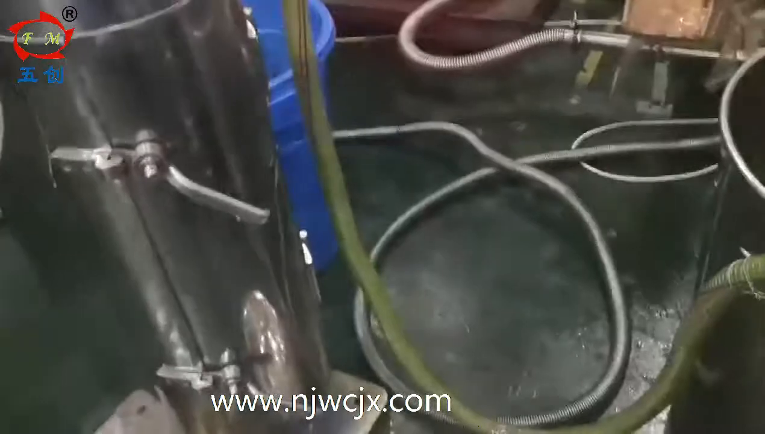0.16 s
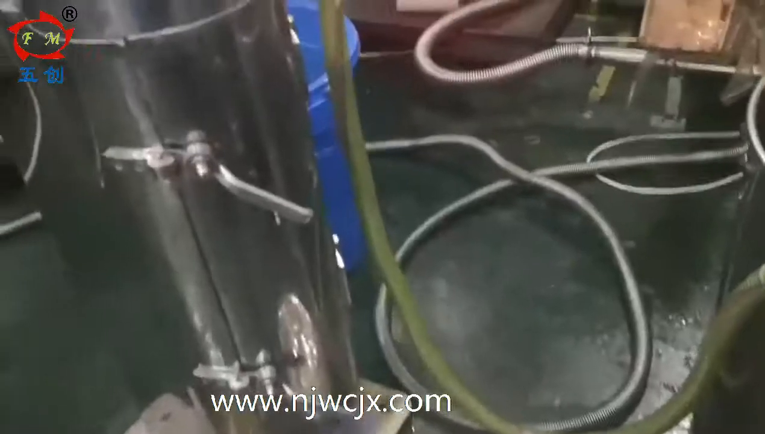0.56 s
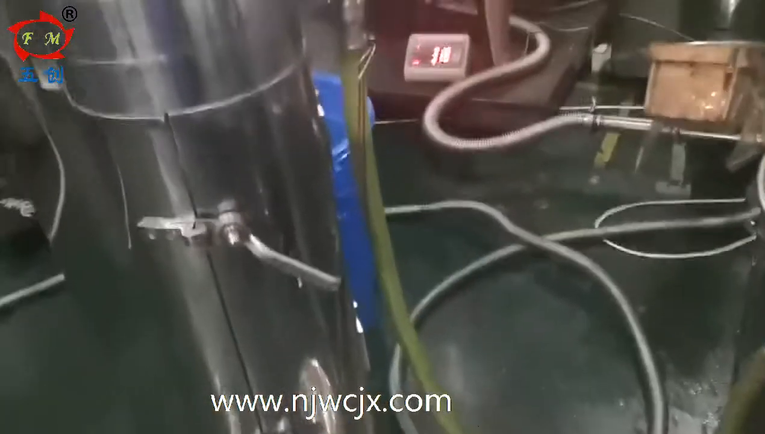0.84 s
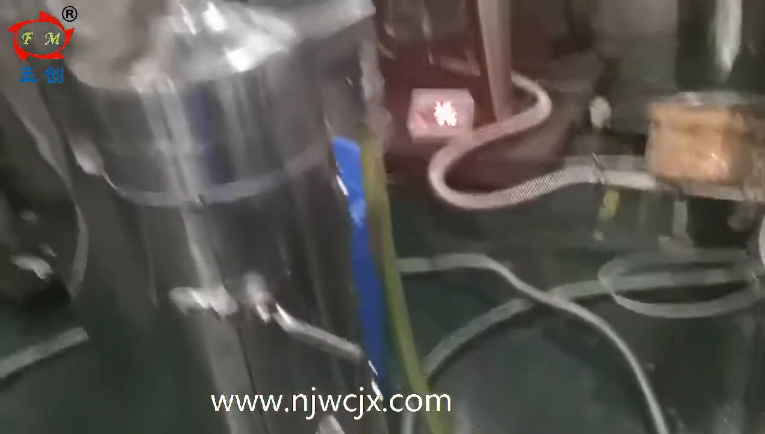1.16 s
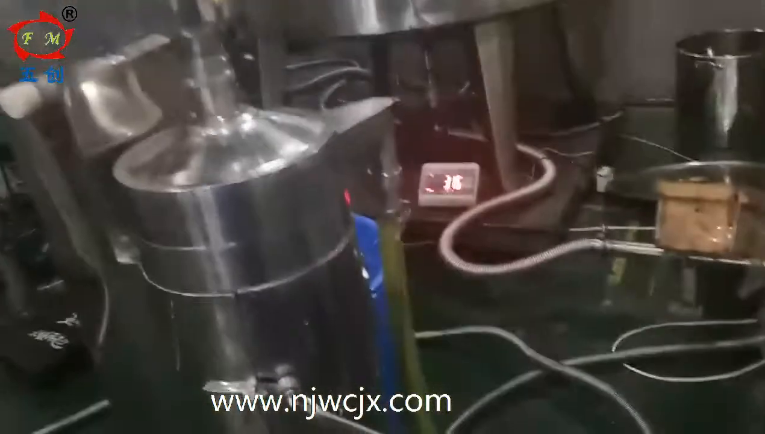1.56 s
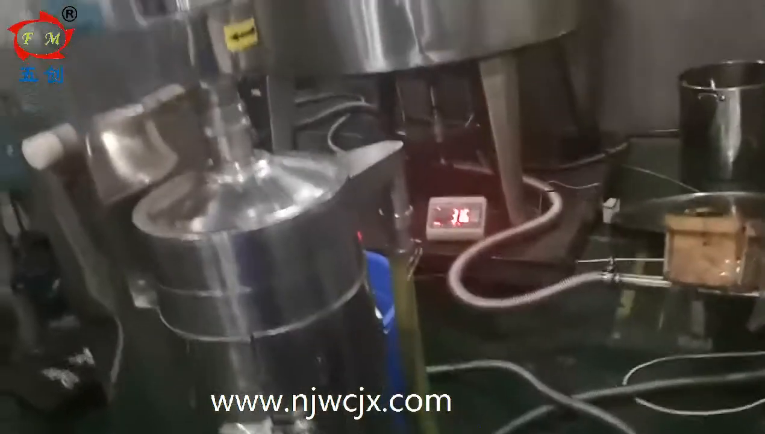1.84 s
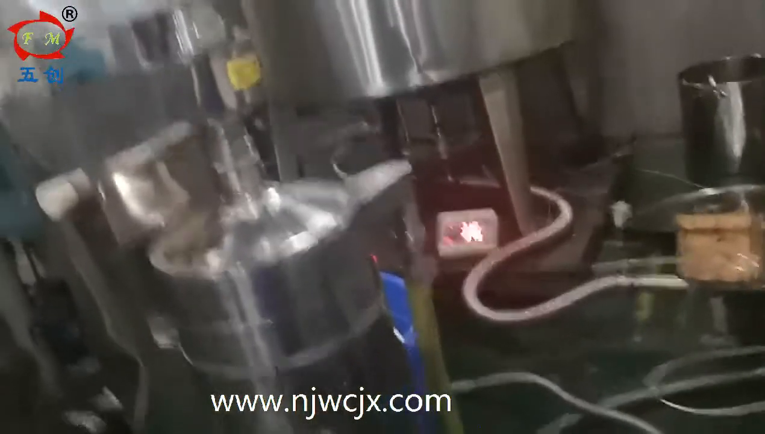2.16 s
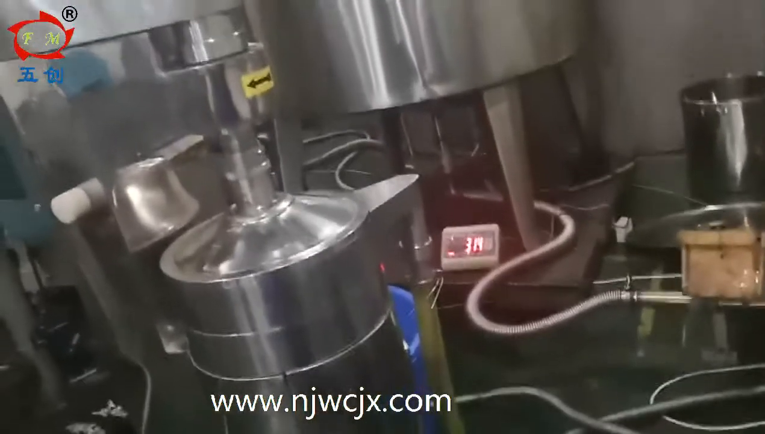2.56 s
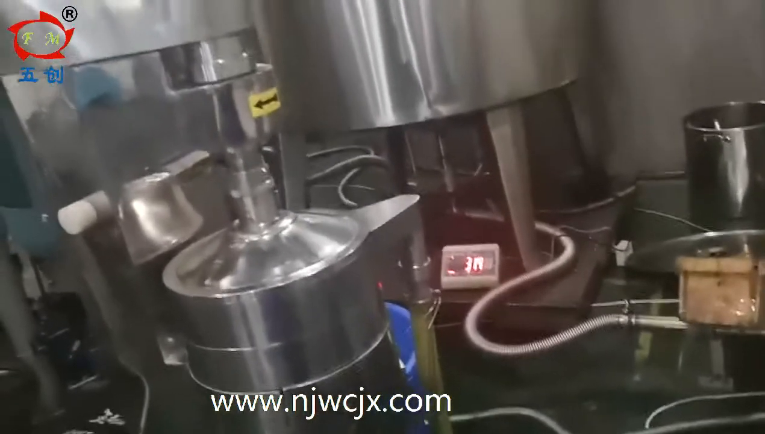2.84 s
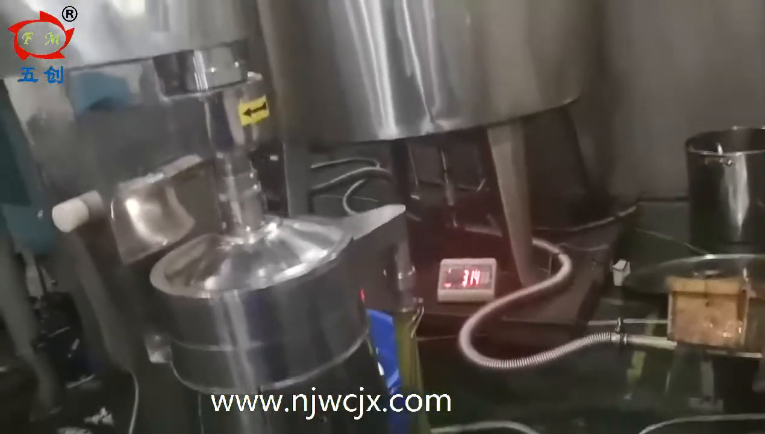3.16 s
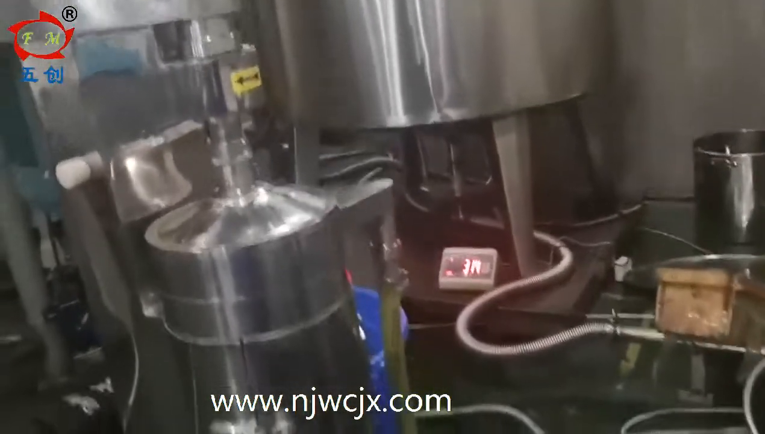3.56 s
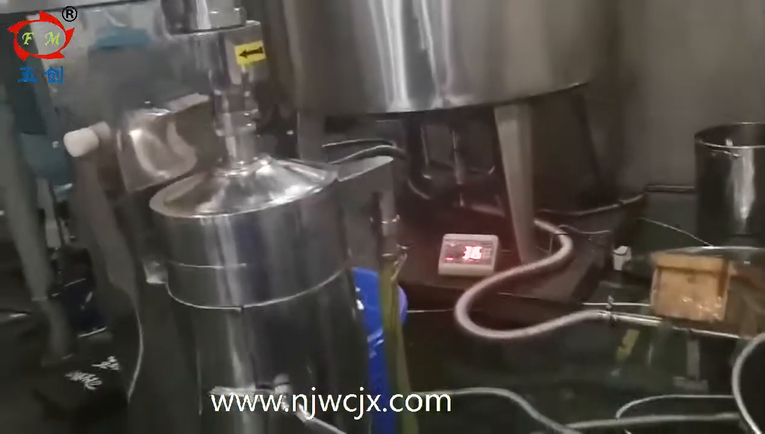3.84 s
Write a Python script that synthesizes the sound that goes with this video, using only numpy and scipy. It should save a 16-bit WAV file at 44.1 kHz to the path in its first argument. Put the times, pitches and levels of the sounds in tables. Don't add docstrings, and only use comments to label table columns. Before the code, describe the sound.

Steady industrial centrifuge roar with beating low hum, ringing metal casing and fine hiss, starting suddenly after a short silence, then dropping slightly in level; close handheld phone in a workshop with other drives whining.

```python
import sys
import numpy as np
from scipy import signal
from scipy.io import wavfile
from scipy.ndimage import uniform_filter1d

SR = 44100
rng = np.random.default_rng(int(sys.argv[2]) if len(sys.argv) > 2 else 0)


def attenuation_scalar(level_db):
    decades = np.asarray(level_db, float) / 20
    return 10 ** decades


def dump_mix(stems):
    frames = np.atleast_2d(stems).T
    limited = np.clip(frames, -1, 1)
    pcm = np.round(limited * 32767).astype(np.int16)
    wavfile.write(sys.argv[1], SR, pcm)


N = 176400

SETTLE_S, SETTLE_SPAN_S = .775, .03


def evened(x):
    return x / np.sqrt(np.mean(x ** 2) + 1e-20)


def read(points, hz):
    f, value = np.transpose(points)
    return np.interp(np.log(hz + 1), np.log(f + 1), value, left=-90, right=-90)


def step(at_s, span_s):
    return .5 - .5 * np.tanh((np.arange(N) / SR - at_s) / (2 * span_s))


def drift(top_hz, count):
    t = np.arange(0, N + 256, 256) / SR
    hz = np.geomspace(.2, top_hz, 16)
    sines = np.sin(2 * np.pi * (hz[:, None] * t + rng.random((count, 16, 1))))
    slow = (sines / np.sqrt(hz)[:, None]).sum(1)
    return np.array([np.interp(np.arange(N) / SR, t, evened(row)) for row in slow])


def tones():
    bowl_hz, idler_hz, motor_hz, fan_hz, belt_hz = 264.97, 71.01, 49.71, 216.55, 11.63
    order_mix = [(1, 0, 0, 0, 0), (3, 0, 0, 0, 0), (5, 0, 0, 0, 0), (6, 0, 0, 0, 0), (0, 1, 0, 0, 0),
                 (0, 3, 0, 0, 0), (0, 5, 0, 0, 0), (0, 6, 0, 0, 0), (1, 1, 0, 0, 0), (1, 3, 0, 0, 0),
                 (1, 5, 0, 0, 0), (2, 10, 0, 0, 0), (0, 0, 0, 1, 0), (0, 0, 0, 2, 0), (0, 0, 0, 0, 2),
                 (0, 0, 0, 0, 3), (0, 0, 0, 0, 4), (0, 0, 0, 0, 5), (0, 0, 0, 0, 10)]
    order_db = [-35.5, -36.7, -46, -49, -41.5, -44, -54, -49, -36.5, -55, -54, -41.5, -45, -48, -55, -54,
                -54, -52, -47]
    order_late_db = [-38, -36, -46, -49, -44, -43, -54, -49, -38, -55, -54, -53, -42, -49, -55, -54, -54,
                     -52, -48]
    whine_hz = [83.23, 120.7, 509.8, 550.2, 742.9, 1027.0, 1080.1, 2118.4, 2208.5, 4918.1, 5598.6, 7590.2,
                8943.6]
    whine_db = [-45, -44.5, -53, -52, -46.5, -50, -44, -48, -46, -61, -59, -65, -74]
    whine_late_db = [-43, -45, -53, -52, -55, -49, -38, -48, -44, -61, -59, -65, -74]
    beat_db = (-32.5, -34.2)
    beat_null_s = .518
    shift_s, shift_span_s, shift_m = 3.2, .09, .14
    waver_db, waver_rad = .8, .15

    t = np.arange(N) / SR
    order_hz = np.dot(order_mix, [bowl_hz, idler_hz, motor_hz, fan_hz, belt_hz])
    hz = np.r_[order_hz, whine_hz][:, None]
    loose = np.sqrt(hz / bowl_hz)
    phase = 2 * np.pi * (hz * t + rng.random(hz.shape))
    phase = phase + waver_rad * loose * drift(3.04, count=len(hz))
    before = attenuation_scalar(np.r_[order_db, whine_db][:, None]) * np.sin(phase)
    later_phase = phase - 2 * np.pi * hz * shift_m / 343
    after = attenuation_scalar(np.r_[order_late_db, whine_late_db][:, None]) * np.sin(later_phase)
    early = step(shift_s, shift_span_s)
    waver = attenuation_scalar(waver_db * np.minimum(loose, 3) * drift(3.0, count=len(hz)))
    hum = waver * (early * before + (1 - early) * after)

    pair_hz = np.array([[2 * idler_hz], [3 * motor_hz]])
    pair_db = np.array(beat_db)[:, None] + waver_db * drift(1.38, count=2)
    pair = attenuation_scalar(pair_db) * np.sin(2 * np.pi * pair_hz * (t - beat_null_s))
    return np.sqrt(2) * (hum.sum(0) + pair[0] - pair[1])


def casing():
    # f/Hz, width/Hz, level/dB
    modes = [(888, 7.1, -44), (1317, 60, -39.5), (1700, 58, -31.5), (1805, 65, -32.5), (1917, 83, -34),
             (2010, 44, -37.5), (2196, 42, -41), (2603, 77, -38), (2894, 52, -47.5), (3593, 130, -40.5),
             (3920, 140, -50), (5380, 340, -41), (5670, 100, -44), (9100, 570, -57)]
    ticks_per_s, tick_spread_db = 2500, 3.0
    swell = drift(6.0, count=len(modes))
    strength = attenuation_scalar(tick_spread_db * np.minimum(rng.exponential(1, N), 5))
    struck = rng.random(N) < ticks_per_s / SR
    ticks = strength * struck * rng.choice([-1., 1.], N)
    out = np.zeros(N)
    for k, (hz, width, db) in enumerate(modes):
        r = np.exp(-np.pi * width / SR)
        poles = [1, -2 * r * np.cos(2 * np.pi * hz / SR), r * r]
        wide_poles = [1, poles[1] * r, r ** 4]
        own_ticks = np.roll(ticks, k * N // len(modes))
        wide = signal.lfilter([1, 0, -1], wide_poles, own_ticks)
        ring = signal.lfilter([1, 0, -1], poles, wide)
        out += attenuation_scalar(db + .8 * swell[k]) * evened(ring)
    return out


def blur(shape, bins, frames):
    z = rng.standard_normal(shape).T
    return evened(uniform_filter1d(uniform_filter1d(z, bins, 0), frames, 1))


def air(shape, level_db, ripple_db, patchy_db, flicker_db):
    size = (N // 512 + 5, 1025)
    hz = np.fft.rfftfreq(2048, 1 / SR)
    z = rng.standard_normal(size).T + 1j * rng.standard_normal(size).T
    field = ripple_db * blur(size, bins=1, frames=120)
    field = field + patchy_db * blur(size, bins=20, frames=8)
    field = field + flicker_db * blur(size, bins=200, frames=3)
    shaped = z * attenuation_scalar(read(shape, hz)[:, None] + field)
    x = signal.istft(shaped, nperseg=2048, noverlap=1536)[1][:N]
    return attenuation_scalar(level_db) * evened(x)


def rumble():
    # f/Hz, level/dB
    spectrum = [(15, -20), (50, -2.5), (90, -1), (130, 0.5), (300, 1), (380, -5), (650, -7.5), (900, -6)]
    return air(spectrum, -30, ripple_db=1.9, patchy_db=0.6, flicker_db=.5)


def roar():
    # f/Hz, level/dB
    spectrum = [(550, -39.5), (800, -6), (1200, -2), (1500, -2), (2200, -2.5), (3100, -9), (4300, -17),
                (5500, -45)]
    return air(spectrum, -23, ripple_db=1.66, patchy_db=0.83, flicker_db=.5)


def hiss():
    # f/Hz, level/dB
    spectrum = [(3500, -51), (4600, -1), (5800, -2), (7000, -5.5), (7700, -7), (8400, -21), (9000, -47)]
    return air(spectrum, -35, ripple_db=3.5, patchy_db=0.54, flicker_db=0.55)


def fizz():
    # f/Hz, level/dB
    spectrum = [(7000, -20), (8500, -0.5), (9800, -1), (11200, -6), (12300, -14), (13000, -21),
                (15200, -27), (16000, -30)]
    low_db, risen_s, rise_span_s = 3, 1.5, 0.17
    x = air(spectrum, -54.5, ripple_db=1.5, patchy_db=0.8, flicker_db=0.6)
    return x * attenuation_scalar(low_db * step(risen_s, rise_span_s))


def scene():
    # t/s, level/dB
    near = [(0.36, 0), (1.0, -0.5), (1.5, -0.1), (2.0, 0.5), (2.5, 0.4), (3.0, 0.94), (3.5, 0.5), (4.0, 0)]
    near_db = np.interp(np.arange(N) / SR, *np.transpose(near))
    low_start_db = 0.4 * step(SETTLE_S, SETTLE_SPAN_S)
    body = (tones() + rumble()) * attenuation_scalar(low_start_db)
    head = attenuation_scalar(near_db) * (roar() + hiss() + casing())
    return (body + fizz() + head)[None]


def top_cut(x):
    return signal.sosfilt(signal.butter(12, 15150, fs=SR, output="sos"), x)


def record(dry):
    start_s, offset = .3575, .0137
    hot_db = 3 * step(SETTLE_S, SETTLE_SPAN_S)
    on = np.clip((np.arange(N) / SR - start_s) / .0004, 0, 1)
    heard = on * attenuation_scalar(hot_db) * (dry + offset * attenuation_scalar(1.4 * hot_db))
    return top_cut(heard)


dry = scene()
out = record(dry)
dump_mix(out)
```